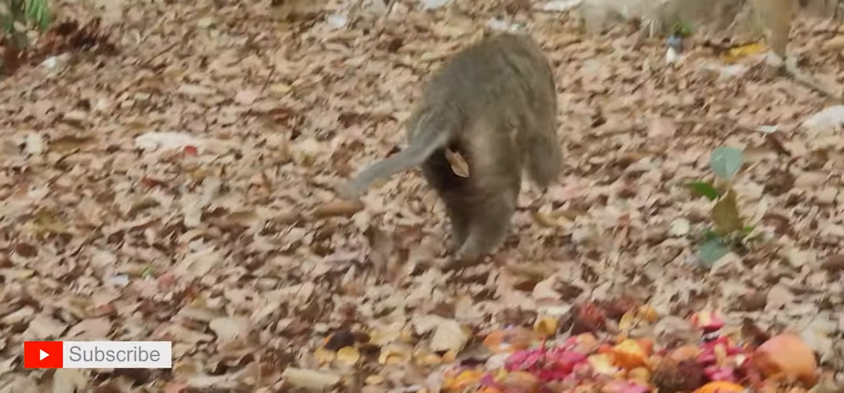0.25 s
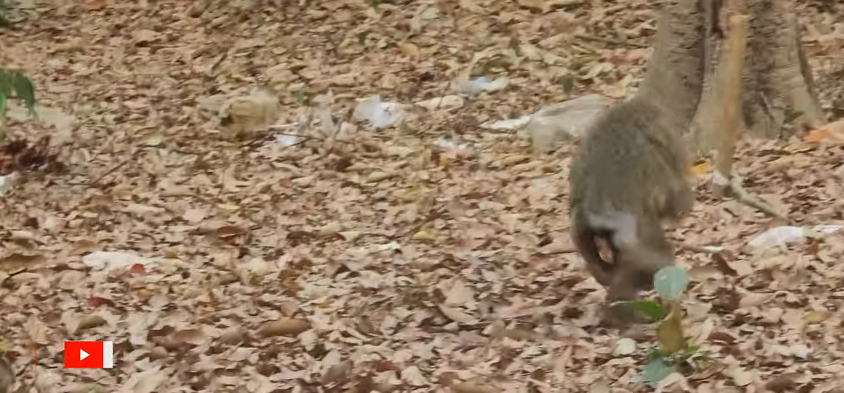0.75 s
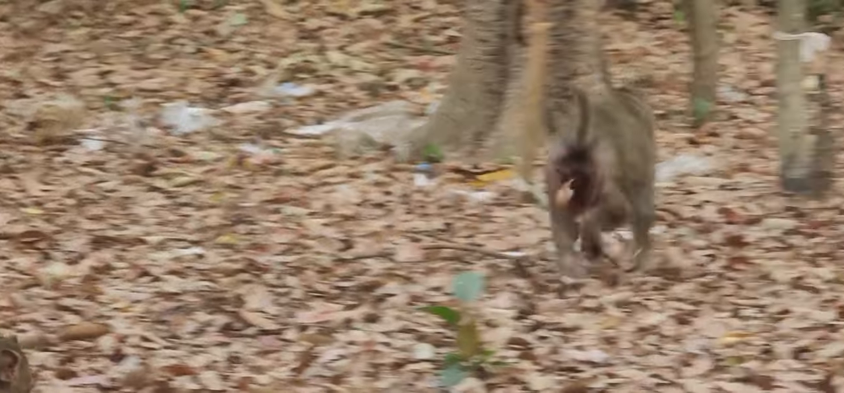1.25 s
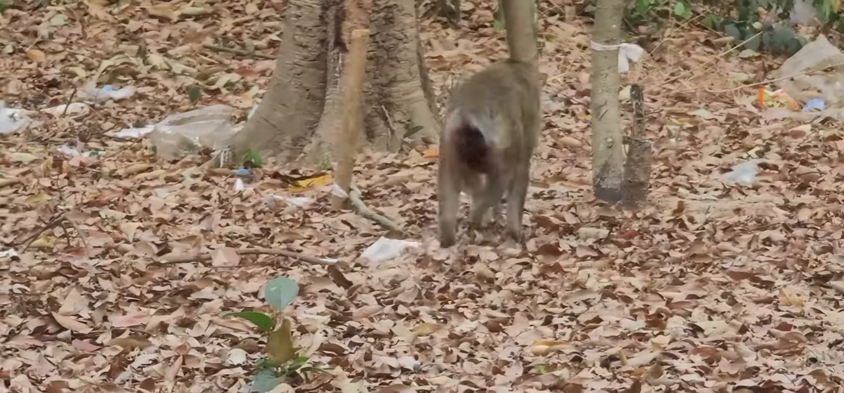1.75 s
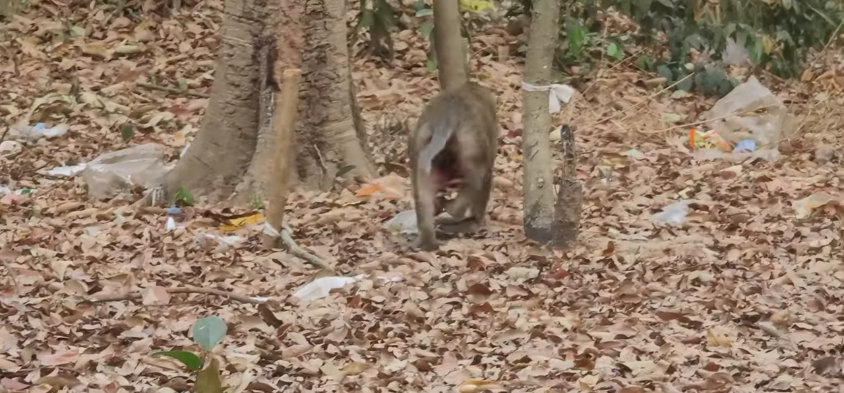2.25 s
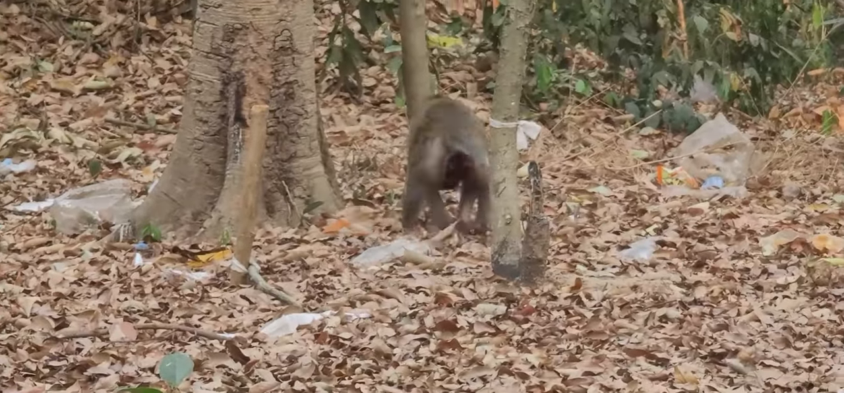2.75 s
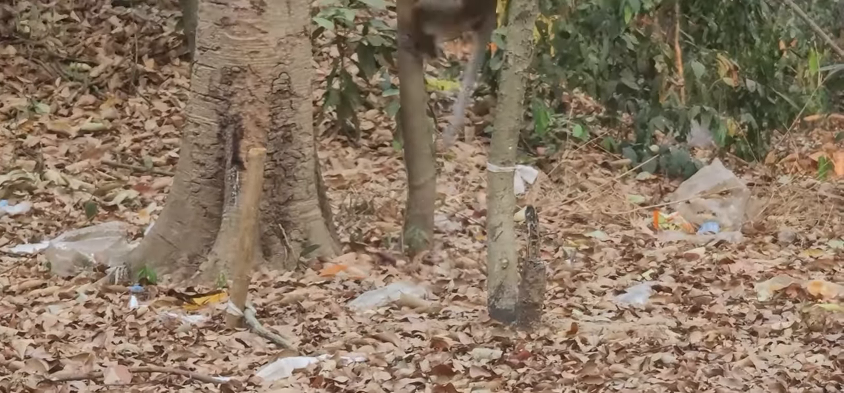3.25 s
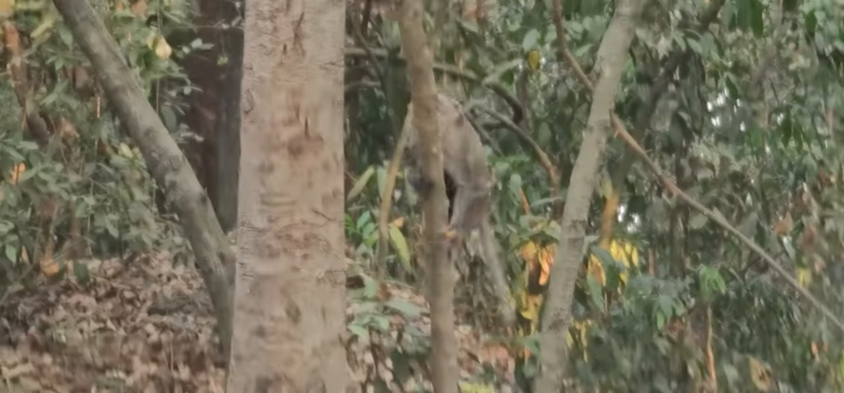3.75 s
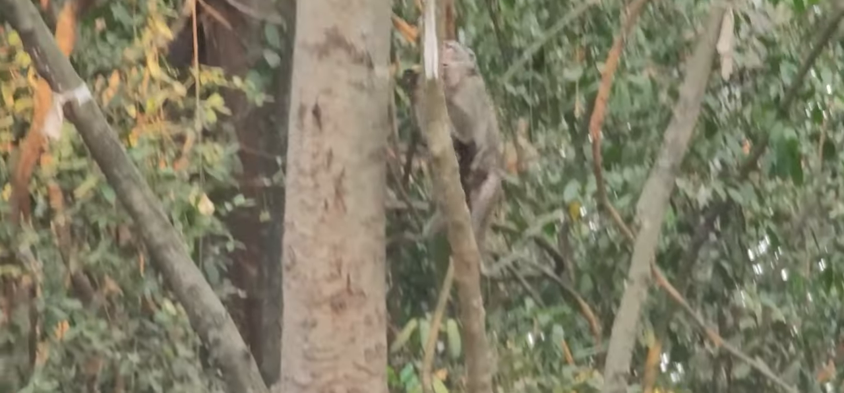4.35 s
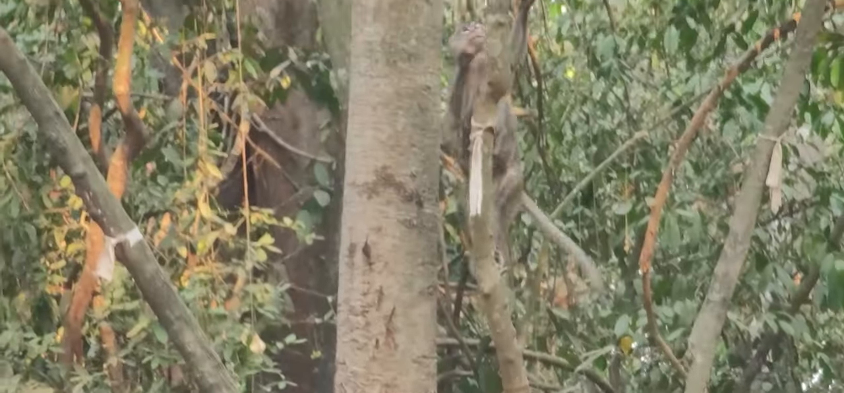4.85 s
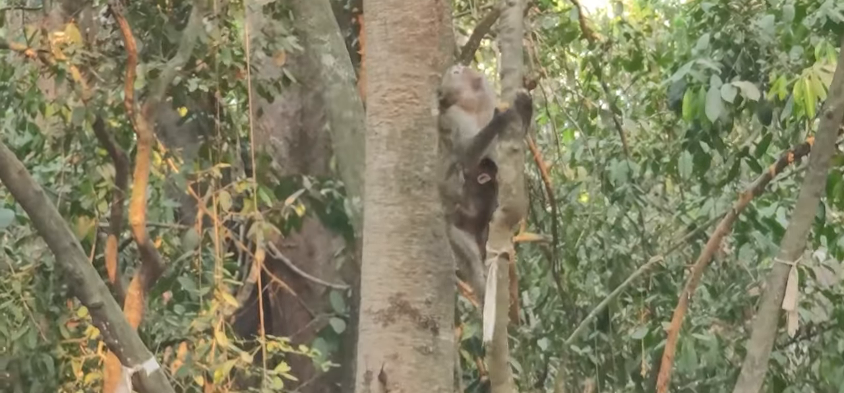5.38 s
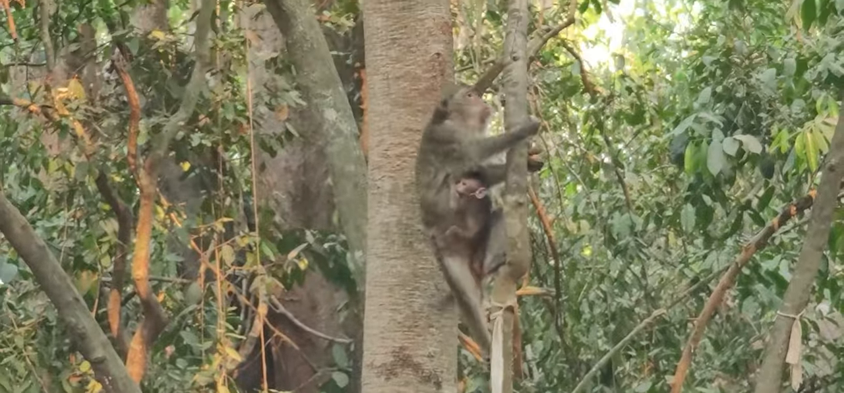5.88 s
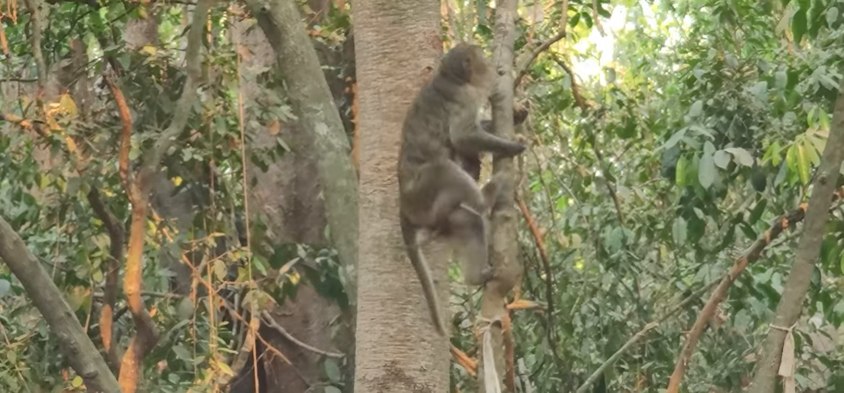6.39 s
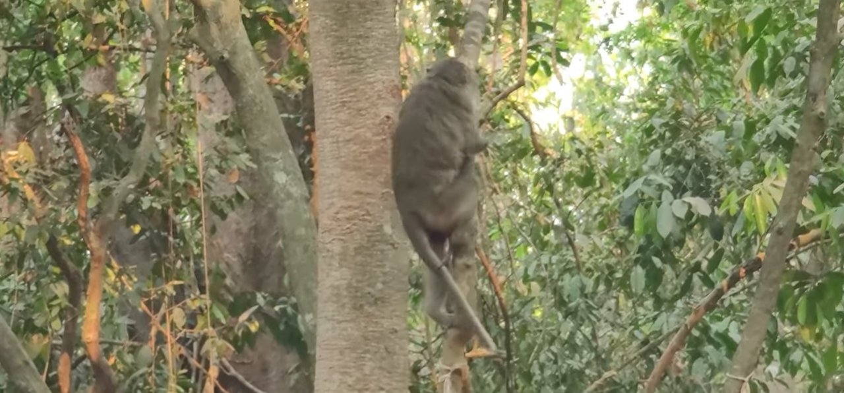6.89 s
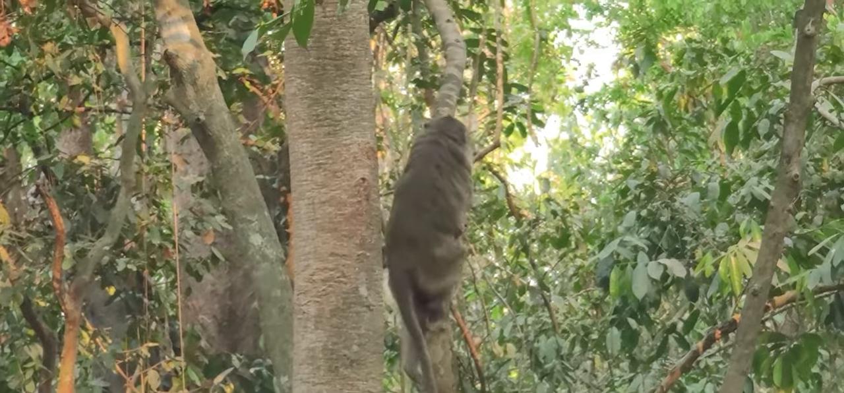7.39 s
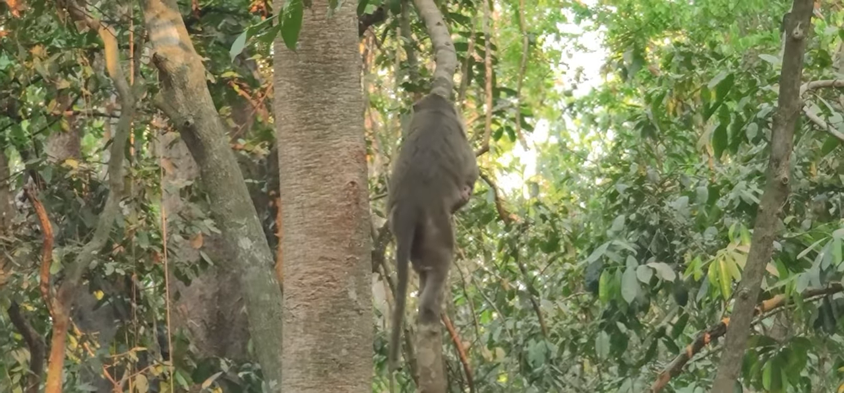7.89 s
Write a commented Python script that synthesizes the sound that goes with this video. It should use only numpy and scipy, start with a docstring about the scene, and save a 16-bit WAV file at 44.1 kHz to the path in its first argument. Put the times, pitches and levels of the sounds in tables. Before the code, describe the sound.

Outdoors among trees, a handheld stereo microphone is swamped by bright, shrill cicadas. Beneath them, quiet footfalls crunch leaf litter for the first three seconds and foliage swishes. A distant engine pulls, then eases to idle over faint traffic. Fingers knock the case mostly on the right, tiny rising calls and a weak horn pass, the left side thickens with insects, and small twigs snap near the end.

```python
"""A loud cicada chorus fills a tropical forest throughout, its clicks smeared into a hiss by the trees.
Two singers whine above it; the high one rests midway. Far traffic rumbles and an engine pulls.
Someone takes five soft steps on leaf litter and foliage swishes; taps on the microphone case tick and thump.
Something calls faintly, the engine drops to idle, a far horn sounds and more cicadas join on the left.
Late on, lower cicadas stop on the right and twigs snap. A limiter holds down the peaks throughout."""
import sys
import numpy as np
from scipy import signal
from scipy.fft import rfft, irfft, next_fast_len
from scipy.io import wavfile
from scipy.ndimage import uniform_filter1d, minimum_filter1d

SR = 44100
rng = np.random.default_rng(int(sys.argv[2]) if len(sys.argv) > 2 else 0)


def digitize_waveform(pressure):
    """Quantize a signal to 16-bit integers and store it at the path in sys.argv[1].

    Rows of a 2-D input are taken as channels; values are limited to [-1, 1].
    """
    field = np.atleast_2d(pressure).T
    bounded = np.clip(field, -1, 1)
    quanta = np.round(bounded * 32767).astype(np.int16)
    wavfile.write(sys.argv[1], SR, quanta)


N = 358533

# Every spectrum is a relative shape. Each row: frequency in Hz, density in dB per Hz.
# Steady chorus on the left and on the right.
CHORUS_LEFT_SPECTRUM = [(1200, -64), (2500, -38), (3200, -28.5), (4100, -10.5), (4600, -8.5), (5100, 0),
                        (5700, -2), (6300, 1), (7100, 1.5), (8300, -2.5), (9400, -18), (10300, -19.5),
                        (11500, -26), (13000, -27.5), (14700, -21.5)]
CHORUS_RIGHT_SPECTRUM = [(1200, -52.5), (2500, -47), (3200, -40.5), (4100, -16.5), (4550, -11), (5150, -1),
                         (5750, -1.5), (6200, 1), (7100, -9.5), (7800, -20.5), (9000, -16.5),
                         (10300, -20.5), (12000, -38), (13400, -30.5), (14700, -32.5)]
# Spectrum of the insects that join on the left.
JOINERS_SPECTRUM = [(2500, -50), (3500, -51), (5100, 2), (7000, 2), (8400, 2), (9500, -13), (11500, -26),
                    (14700, -25)]
# Spectrum of the lower-pitched insects that fall silent on the right.
LEAVERS_SPECTRUM = [(2000, -26.5), (2900, -16.5), (3500, -7.5), (4100, 7.5), (4700, 3.5), (6000, -34)]
# Pitches of the two near singers: high in Hz, low in Hz.
HIGH_HZ, LOW_HZ = (7040, 6238)
# Spectrum of far traffic and forest air.
RUMBLE_SPECTRUM = [(12, -50), (22, -20), (36, -7), (57, 0.5), (100, -2), (155, -3.5), (230, -18),
                   (330, -28), (560, -37), (850, -24), (1200, -21), (1550, -30.5), (2200, -23), (3200, -94),
                   (5000, -100)]
# Diffuse sound in the two channels. Each row: frequency in Hz, left-right likeness from -1 to 1.
LEFT_RIGHT_LIKENESS = [(30, 0.82), (60, 0.99), (160, 0.95), (300, 0.84), (700, 0.25), (1200, -0.61),
                       (2200, 0.12)]
# Engine harmonics. Each row: multiple of the shaft rate, relative level in dB.
ENGINE_ORDERS_DB = [(2, 3), (3, -3), (4, -6.5), (5, -15.5)]
# Case taps. Each row: contact in seconds, relative tick in dB, relative thump in dB, left minus right in dB.
CASE_KNOCKS = [(0.04, -40.5, -51, 8), (3.536, -26, -18.5, -24), (5.224, -28, -21.5, -16),
               (5.644, -29.5, -23, -26), (6.336, -29, -36, -12)]
# Modes of the held case. Each row: frequency in Hz, relative level in dB, t60 in seconds.
CASE_MODES = [(54, -6, 0.28), (97, 1, 0.13), (177.6, -3.5, 0.12)]
# Spectrum of the dry tick on the case.
TICK_SPECTRUM = [(100, -19), (350, -6.5), (1000, 3), (2000, -7), (4000, 7.5), (9000, -28)]
# Footfalls. Each row: start in seconds, relative level in dB, relative level of kicked-up leaves in dB.
FOOTFALLS = [(.1, -33, -44), (0.719, -33.5, -39), (1.477, -31.5, -45), (2.195, -32, -50),
             (2.945, -31.5, -55)]
# Spectrum of the sole meeting the ground.
SOLE_SPECTRUM = [(150, -30), (300, -10), (410, 1.5), (660, -1), (1100, 1.5), (1350, -26), (1800, -31),
                 (4000, -60)]
# Spectrum of trodden leaves.
LITTER_SPECTRUM = [(150, -35), (280, -16), (400, -7.5), (560, -4.5), (670, 2.5), (950, -3.5), (1280, 3),
                   (1550, -4), (2300, -7.5), (3500, -47), (6000, -70)]
# Dry leaves and twigs brushing. Each row: peak in seconds, relative level in dB, 1/e half length in seconds.
LEAF_SWISHES = [(0.375, -43.5, 0.055), (1.193, -41.5, .033), (5.84, -46.5, 0.13)]
# Spectrum of brushing leaves.
LEAVES_SPECTRUM = [(300, -28), (800, 2.5), (1300, 0.5), (2100, -1), (3200, 4), (6000, -11), (12000, -40)]
# Far rising calls. Each row: loudest moment in seconds, pitch there in Hz, relative level in dB.
FAR_CALLS = [(3.64, 1085, -53), (3.76, 815, -53), (4.66, 1240, -54), (5.84, 855, -50)]
# Horn partials. Each row: multiple of the horn's pitch, relative level in dB.
HORN_PARTIALS_DB = [(1, -2), (2, -7), (3, -3)]
# Small twigs snapping. Each row: start in seconds, level at the start in dB.
TWIG_SNAPS = [(6.886, -40), (7.067, -40), (7.31, -38)]
# Spectrum of a snapping twig.
TWIG_SPECTRUM = [(300, -25), (900, 0), (1500, -12), (2200, 1), (3300, 2), (6000, -14), (12000, -35)]

LEFT_DB, RIGHT_DB = -15, -10.5  # steady chorus
JOIN_S, JOIN_TAKES_S, JOINERS_DB = 5.57, 1, -18.5
LEAVE_S, LEAVE_TAKES_S, LEAVERS_DB = 6.65, 1, -32
# the high singer rests once and comes back louder; the low one drifts about its level
HIGH_DB, REST_CHANGE_DB, RETURN_CHANGE_DB = -26.5, -17, 1.5
REST_S, RESUME_S, FADE_S = 2.1, 5.4, 2.1
LOW_DB, LOW_DRIFT_DB = -26, 1
RUMBLE_START_DB, RUMBLE_FADE_DB_PER_S = -42, 0.22  # the traffic draws away
# the engine gains speed under load, then the throttle closes and it falls to idle
START_HZ, GAIN_HZ_PER_S, IDLE_HZ = 33.8, 0.8, 28.3
LOAD_DB, IDLE_DB = -43, -48.5
RELEASE_S = 4.3
RUN_DOWN_S, UNLOAD_S = 0.46, 0.13  # time constants: the exhaust quietens sooner than the shaft slows
LAND_S, PAT_T60_S, SETTLE_T60_S = 0.016, 0.18, 0.64  # a sole lands, its pat dies, the litter settles
SCUFF_AFTER_S, SCUFF_DB = 0.3, -11.5  # the other foot pushes off
# leaves and clothes stir until the walker stops
STOP_S, STOP_TAKES_S, WALKING_DB, STANDING_DB = 3.5, 0.32, -53.5, -62.5
KICK_AFTER_S, KICK_HALF_S = 0.075, 0.032  # leaves fly up just after each landing
CALL_HALF_S, CALL_RISE_HZ_PER_S, OVERTONE_DB = 0.056, 670, -5
HORN_HZ, HORN_DB = 500, -59
SNAP_T60_S = 0.14
TOP_HZ = 15780


def amp(db):
    """Decibels to gain."""
    return 10 ** (np.asarray(db) / 20)


def unit(x):
    """Scale to rms 1."""
    return x / np.sqrt(np.mean(x ** 2) + 1e-20)


def along(points, hz):
    """(Hz, value) points joined on a log frequency axis."""
    f, v = np.transpose(points)
    return np.interp(np.log(hz + 1), np.log(f + 1), v)


def since(s):
    """Seconds elapsed since s, zero before it."""
    return np.maximum(np.arange(N) / SR - s, 0)


def ramp(middle_s, takes_s):
    """A smooth change from 0 to 1 around middle_s."""
    return 0.5 + 0.5 * np.tanh(2 * (since(0) - middle_s) / takes_s)


def swell(s, half_s):
    """A bell-shaped rise and fall that peaks at s."""
    return np.exp(-((since(0) - s) / half_s) ** 2)


def wobble(rate):
    """A smooth random curve, rate knots a second."""
    knots = signal.resample_poly(rng.standard_normal(int(N * rate / SR) + 4), 10, 1)
    return np.interp(np.arange(N) * rate * 10 / SR, np.arange(len(knots)), knots)


def filtered(x, response):
    """x times a response of frequency."""
    m = next_fast_len(N + SR // 4)
    return irfft(rfft(x, m) * response(np.fft.rfftfreq(m, 1 / SR)), m)[..., :N]


def coloured(x, spectrum):
    """x shaped by (Hz, dB) points, at rms 1."""
    return unit(filtered(x, lambda hz: amp(along(spectrum, hz))))


def diffuse(spectrum, patchy_db):
    """Noise patchy in time and pitch, its left-right likeness set by mixing mid and side."""
    z = signal.stft(rng.standard_normal((2, N)), nperseg=1024)[2]
    patches = uniform_filter1d(rng.standard_normal(z.shape[1:]), size=4, axis=0)
    patches = uniform_filter1d(patches, size=10, axis=1)
    pair = signal.istft(z * amp(patchy_db * unit(patches)), nperseg=1024)[1][:, :N]

    def mid_side_response(hz):
        angle = np.arccos(np.clip(along(LEFT_RIGHT_LIKENESS, hz), -1, 1)) / 2
        return amp(along(spectrum, hz)) * [np.cos(angle), np.sin(angle)]

    mid, side = filtered(pair, mid_side_response)
    return unit(np.array([mid + side, mid - side]))


def scattered(x, t60_s):
    """Echoes off trunks and moving leaves: each short stretch of sound gets a tail of its own."""
    size = SR // 5
    blocks = np.resize(x, (N // size + 2, size))
    tails = rng.standard_normal(blocks.shape) * amp(-60 * np.arange(size) / SR / t60_s)
    rung = irfft(rfft(blocks, 2 * size) * rfft(tails, 2 * size))
    return (rung[1:, :size] + rung[:-1, size:]).ravel()[:N]


def cicada(click_hz, jitter, swell_db):
    """One insect: its tymbals click in a fast uneven train, heard through the forest."""
    spread = 0.3 * rng.standard_normal()
    rate_hz = click_hz * np.exp(spread + 0.05 * wobble(3) + jitter * wobble(200))
    clicks = np.diff(np.floor(np.cumsum(rate_hz) / SR), prepend=0)
    return unit(scattered(clicks, t60_s=0.31)) * amp(swell_db * wobble(9))


def crowd(count):
    """Independent cicadas summed."""
    return sum(cicada(click_hz=330.7, jitter=0.2, swell_db=0.87) for _ in range(count))


def chorus():
    """Crowds ring in the band of their bodies; a group joins on the left, a lower one stops on the right."""
    left = amp(LEFT_DB) * coloured(crowd(7), CHORUS_LEFT_SPECTRUM)
    right = amp(RIGHT_DB) * coloured(crowd(7), CHORUS_RIGHT_SPECTRUM)
    joined = ramp(JOIN_S, JOIN_TAKES_S)
    joiners = amp(JOINERS_DB) * joined * coloured(crowd(2), JOINERS_SPECTRUM)
    remaining = 1 - ramp(LEAVE_S, LEAVE_TAKES_S)
    leavers = amp(LEAVERS_DB) * remaining * coloured(crowd(2), LEAVERS_SPECTRUM)
    return np.array([left + joiners, right + leavers])


def whine(hz, half_width_hz):
    """A sharply tuned tone blurred into a narrow band of noise, at rms 1."""
    return unit(filtered(rng.standard_normal(N), lambda f: 1 / (1 + ((f - hz) / half_width_hz) ** 2)))


def singers():
    """Two nearer cicadas: the high one, mainly left, rests midway; the low one, mainly right, swells at random."""
    resumed = ramp(RESUME_S, FADE_S)
    resting = ramp(REST_S, FADE_S) - resumed
    high_db = HIGH_DB + REST_CHANGE_DB * resting + RETURN_CHANGE_DB * resumed
    high = amp(high_db) * whine(HIGH_HZ, half_width_hz=100)
    low = amp(LOW_DB + LOW_DRIFT_DB * wobble(2)) * whine(LOW_HZ, half_width_hz=32)
    return np.array([high + amp(-19) * low, low + amp(-6) * high])


def rumble():
    """Far traffic and forest air: patchy low noise that slowly fades."""
    level_db = RUMBLE_START_DB - RUMBLE_FADE_DB_PER_S * since(0) + 1.4 * wobble(3.5)
    return amp(level_db) * diffuse(RUMBLE_SPECTRUM, patchy_db=2)


def engine():
    """Harmonics of the shaft rate; speed and level follow the throttle."""
    coasting = np.exp(-since(RELEASE_S) / RUN_DOWN_S)
    load = np.exp(-since(RELEASE_S) / UNLOAD_S)
    shaft_hz = IDLE_HZ + coasting * (START_HZ + GAIN_HZ_PER_S * since(0) - IDLE_HZ)
    phase = 2 * np.pi * np.cumsum(shaft_hz * (1 + 0.005 * wobble(5.6))) / SR
    level_db = IDLE_DB + load * (LOAD_DB - IDLE_DB) + wobble(1.96)
    return sum(amp(level_db + db + 1.4 * wobble(5)) * np.sin(k * phase) for k, db in ENGINE_ORDERS_DB)


def knocks():
    """Fingers brush and tap the case: a dry noise tick and a low thump of decaying modes, mostly right."""
    out = np.zeros((2, N))
    for s, tick_db, thump_db, pan_db in CASE_KNOCKS:
        t = since(s)
        approach = amp(-60 * np.maximum(s - since(0), 0) / 0.042)  # brush builds up to contact
        decay = amp(-60 * t / 0.018) + amp(-5 - 60 * t / 0.19)
        tick = approach * decay * coloured(rng.standard_normal(N), TICK_SPECTRUM)
        thump = sum(amp(db - 60 * t / t60_s) * np.sin(2 * np.pi * hz * t) for hz, db, t60_s in CASE_MODES)
        out += amp([[pan_db], [0]]) * (amp(tick_db) * tick + amp(thump_db) * thump)
    return out


def footfalls(delay_s, t60_s):
    """The pressure of every step: a quick landing, then a fade."""
    pressure = np.zeros(N)
    for s, db, _ in FOOTFALLS:
        t = since(s + delay_s)
        pressure += amp(db - 60 * t / t60_s) * (1 - np.exp(-(t / LAND_S) ** 2))
    return pressure


def steps():
    """Each sole pats, litter crunches and settles, the other foot scuffs; a faint rustle goes on between."""
    pat = amp(-1.5) * footfalls(0, PAT_T60_S) * diffuse(SOLE_SPECTRUM, patchy_db=-0.5)
    press = footfalls(0, SETTLE_T60_S) + amp(SCUFF_DB) * footfalls(SCUFF_AFTER_S, SETTLE_T60_S)
    rustle_db = WALKING_DB + (STANDING_DB - WALKING_DB) * ramp(STOP_S, STOP_TAKES_S)
    envelope = np.hypot(amp(-2.5) * press, amp(rustle_db + 4 * wobble(9)))
    grain = unit(amp(2.15 * wobble(140)))
    return pat + envelope * grain * diffuse(LITTER_SPECTRUM, patchy_db=4.5)


def swishes():
    """Leaves brush in brief crackly swells, after each footfall and now and then besides."""
    kicked = sum(amp(db) * swell(s + KICK_AFTER_S, KICK_HALF_S) for s, _, db in FOOTFALLS)
    brushed = sum(amp(db) * swell(s, half_s) for s, db, half_s in LEAF_SWISHES)
    crackle = unit(amp(2 * wobble(250)))
    return (kicked + brushed) * crackle * diffuse(LEAVES_SPECTRUM, patchy_db=0)


def calls():
    """Faint notes deep in the trees, nearly pure, slide upward and flutter in pitch and level."""
    out = np.zeros(N)
    for s, hz, db in FAR_CALLS:
        pitch_hz = (hz + CALL_RISE_HZ_PER_S * (since(0) - s)) * (1 + 0.0258 * wobble(97))
        phase = 2 * np.pi * np.cumsum(pitch_hz) / SR
        tone = np.sin(phase) + amp(OVERTONE_DB) * np.sin(2 * phase)
        out += amp(db + 2.4 * wobble(45)) * swell(s, CALL_HALF_S) * tone
    return out


def horn():
    """A far horn: narrow-band partials with a short rise and a decay."""
    hoot = np.clip(since(5.43) / 0.13, 0, 1) * amp(-60 * since(5.95) / 0.5)
    partials = sum(amp(db) * whine(k * HORN_HZ, half_width_hz=6) for k, db in HORN_PARTIALS_DB)
    return amp(HORN_DB) * hoot * partials


def twigs():
    """Small twigs snap with a bright noise tick that dies quickly."""
    snaps = sum(amp(db - 60 * since(s) / SNAP_T60_S) * (since(s) > 0) for s, db in TWIG_SNAPS)
    return snaps * diffuse(TWIG_SPECTRUM, patchy_db=4)


def scene():
    """Everything that reaches the two microphones."""
    forest = chorus() + singers() + calls()
    road = rumble() + engine() + horn()
    walker = knocks() + steps() + swishes() + twigs()
    return forest + road + walker


def limiter(x, ceiling, hold_s):
    """The gain ducks smoothly around each peak that would pass the ceiling."""
    size = 2 * max(int(hold_s * SR / 2), 2) + 1
    needed = np.minimum(1, ceiling / (np.abs(x) + 1e-9))
    return x * uniform_filter1d(minimum_filter1d(needed, size), size)


def record(dry):
    """Limit the peaks, then remove everything from TOP_HZ up."""
    limited = limiter(dry, ceiling=0.86, hold_s=0.0073)
    return filtered(limited, lambda hz: hz < TOP_HZ)


dry = scene()
out = record(dry)
digitize_waveform(out)
```